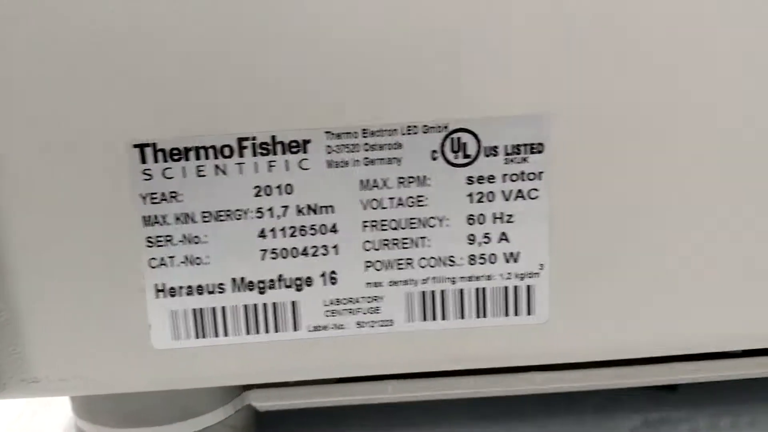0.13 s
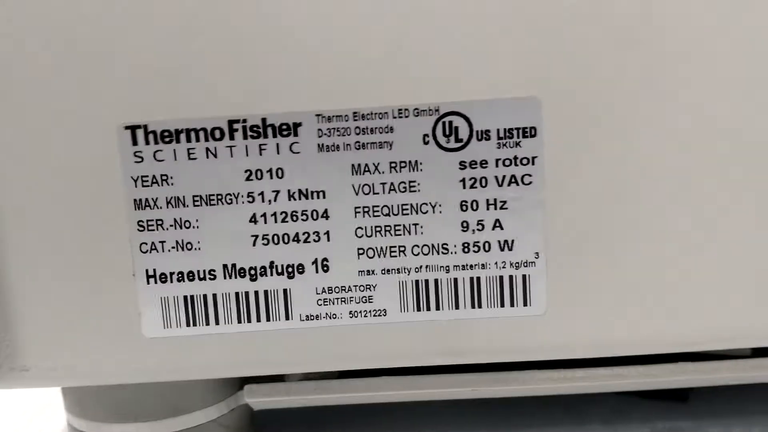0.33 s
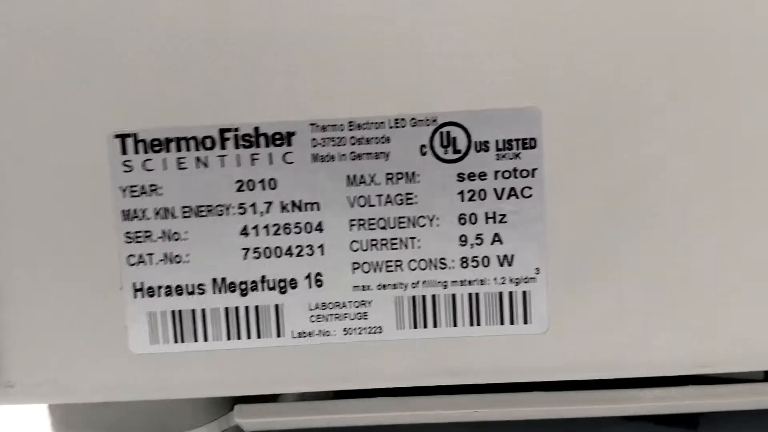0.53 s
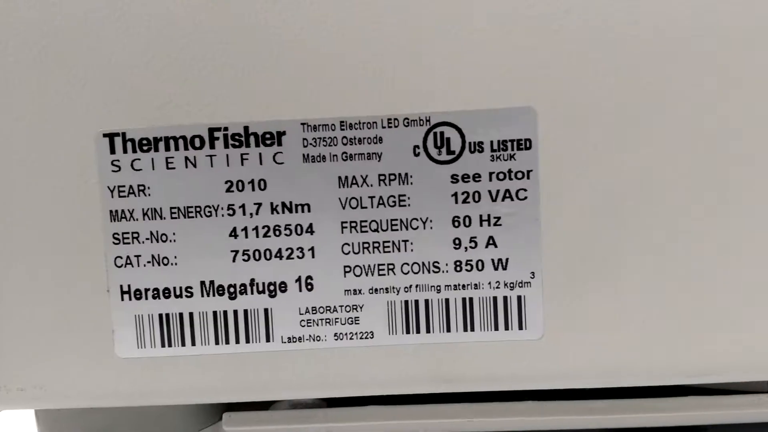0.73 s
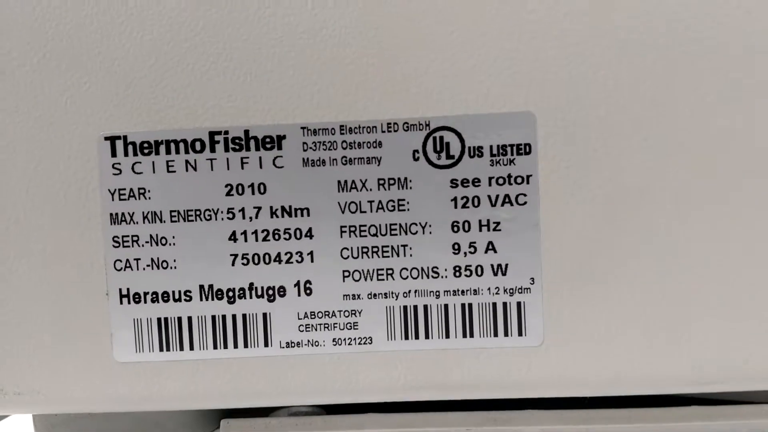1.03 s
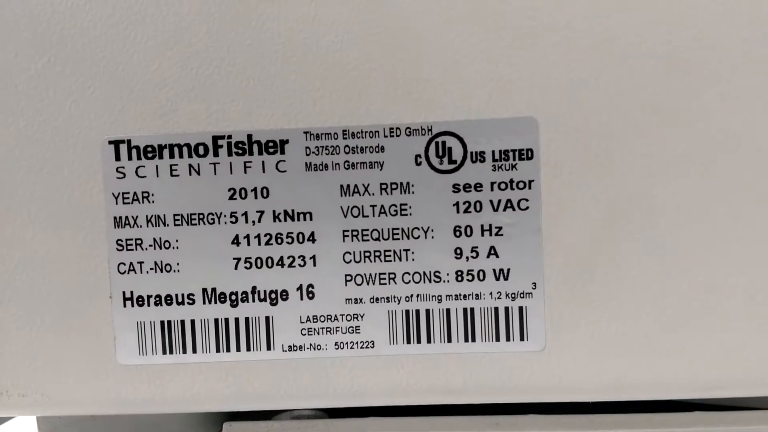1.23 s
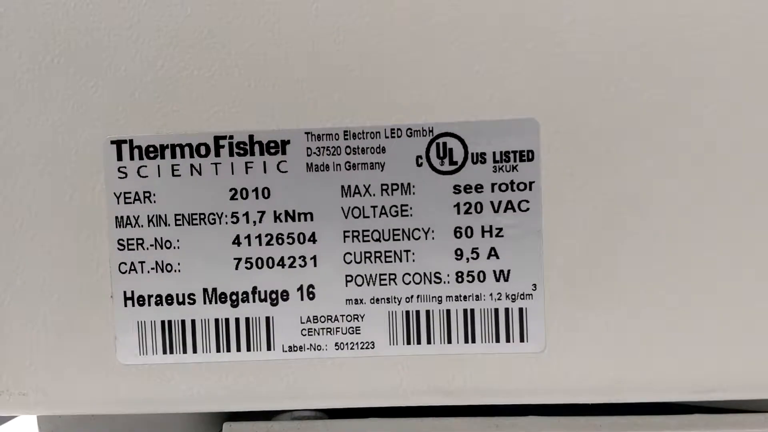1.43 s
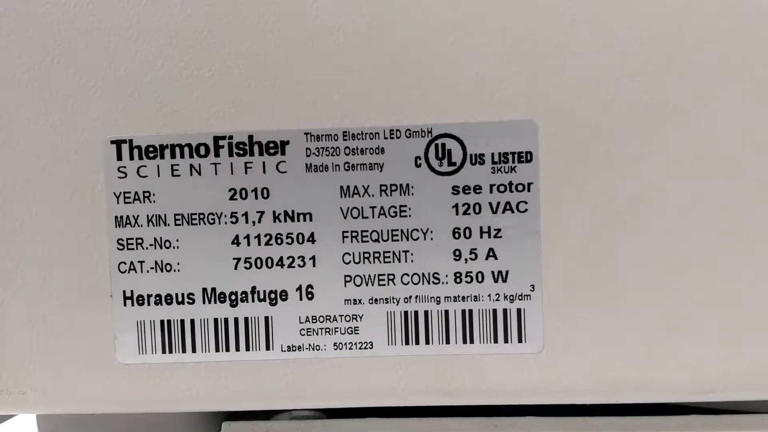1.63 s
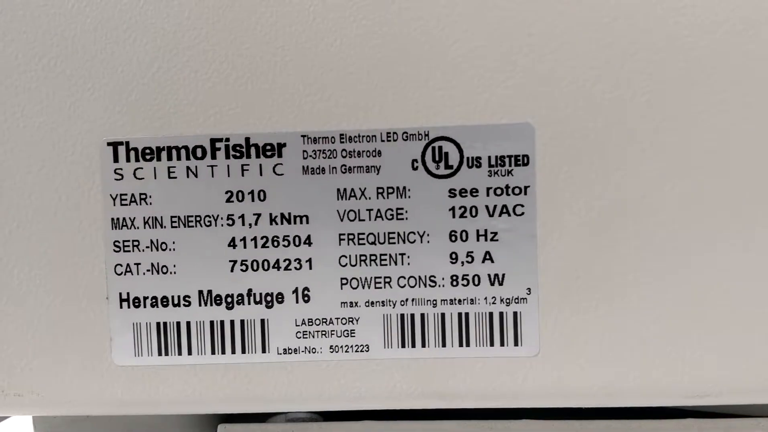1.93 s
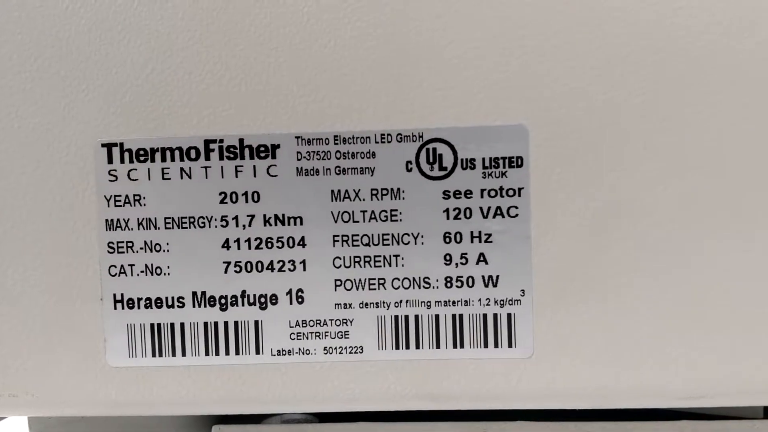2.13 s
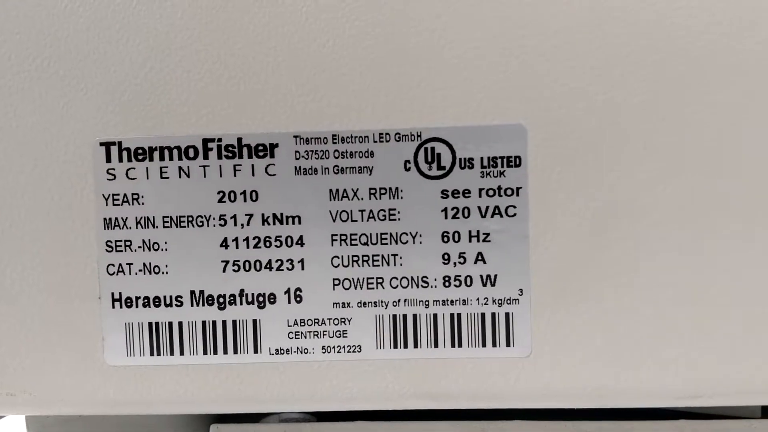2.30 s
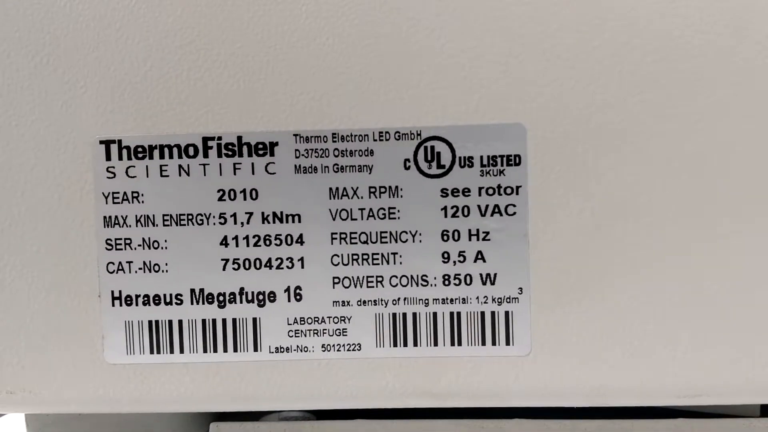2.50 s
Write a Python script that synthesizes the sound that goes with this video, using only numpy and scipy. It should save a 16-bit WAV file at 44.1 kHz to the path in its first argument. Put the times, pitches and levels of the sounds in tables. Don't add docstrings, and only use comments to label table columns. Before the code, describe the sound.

A laboratory centrifuge accelerates throughout, close to a hand-held stereo phone indoors. Its smooth hum, near 205 Hz with an octave above, glides slightly upward over low airy rumble, soft hiss and fan hum, with thin high bearing tones passing. A finger creaks and snaps faintly around 0.4 s, ticking at 0.8 and 1.2-1.3 s. Air dips near 1.4 s; a faint rapid rattle swells until 2.3 s; whirring continues to about 2.6 s.

```python
import sys
import numpy as np
from scipy import signal
from scipy.io import wavfile
from scipy.ndimage import uniform_filter1d

SR = 44100
rng = np.random.default_rng(int(sys.argv[2]) if len(sys.argv) > 2 else 0)


def int16_out(signal):
    q = np.round(np.clip(np.atleast_2d(signal).T, -1, 1) * 32767)
    wavfile.write(sys.argv[1], SR, q.astype(np.int16))


def invert_db(x):
    u = np.asarray(x, float) / 20
    return 10 ** u


N = 117306

# [f/Hz, left level/dB, right level/dB, left lead/rad]
UNBALANCE_PATH = [(51, -58, -62, 0), (55, -50, -48, .3), (59, -49, -43, 1.7), (60.7, -40, -36, 2.2),
                  (62.4, -40, -38, 2.3)]
BUCKET_PATH = [(206.7, -29.5, -27.5, 0.7), (209.8, -32, -20.5, -.5), (217, -23, -40, -3),
               (229.2, -38, -29.5, -1.5), (231, -27.5, -27.5, 0.3), (235, -24, -44, -1),
               (243.2, -15.5, -22.5, -1), (247.7, -17.5, -31, -1)]
BUCKET_OCTAVE_PATH = [(411, -31.5, -19.5, .4), (424, -25, -21.5, .1), (429.5, -21, -19, -.3),
                      (436, -23, -20, -.4), (461, -16.5, -15.5, 0.22), (463, -16, -19.5, 0.35),
                      (499, -19, -27, -0.065), (487, -20.5, -24, -0.39)]
BEARING_ORDERS = [77.33, 78.12, 79.75, 81.46, 82.25, 83.5, 84.42, 85.21, 85.58, 88.54, 89.29, 89.67, 91.79,
                  93.75]
BEARING_LEVELS = [-51, -49, -57, -47, -46, -58, -53, -52, -45.5, -54, -54, -48.5, -60, -56]
# [f/Hz, level/dB, width/Hz]
LOOSE_PART_MODES = [(10350, -1, 700), (11400, -1, 900), (11200, -4, 3500)]
# [t/s, length/s, level/dB, f/Hz, width/Hz]
CREAKS = [
    (.384, .012, -44, 12000, 9000),
    (.3955, .0022, -32, 11000, 9000),
    (.3985, .009, -47, 8000, 9000),
    (.4136, .0028, -41, 9500, 9000),
]
# [t/s, length/s, level/dB, f/Hz, width/Hz]
TICKS = [
    (.4374, .003, -54, 9000, 5000),
    (.7882, .0018, -44, 10500, 2200),
    (1.226, .003, -49, 11500, 6000),
    (1.303, .0025, -52, 11500, 6000),
]
# [f/Hz, width/Hz, level/dB]
SHELL_MODES = [(3300, 500, 12), (6200, 400, 14), (7500, 500, 13)]
# [t/s, level/dB]
AIR_SWELL = [
    (0, -27),
    (.3, -26.5),
    (.5, -27.5),
    (.6, -25),
    (1.2, -23.5),
    (1.29, -23),
    (1.38, -26),
    (2.1, -24.5),
    (2.66, -25.5),
]
# [f/Hz, level/dB per Hz]
RUMBLE_COLOUR = [(40, -6), (70, -11.5), (120, 0), (200, -0.5), (320, -4), (550, -2.5), (980, 0), (1250, -7)]
# [f/Hz, level/dB per Hz]
HISS_COLOUR = [(1000, -3.5), (1500, -0.5), (2100, -5), (2900, -9.5), (4400, -13), (6000, -13),
               (8500, -23.5), (19000, -35.5)]
# [f/Hz, left minus right level/dB]
MIC_TILT = [(60, -5), (350, -4.5), (1090, -.3), (1550, 6), (2050, 0), (8600, 0), (10000, -9.5),
            (15500, -9.5)]

PORT_S = 1 / 2150


def evened(x):
    return x / np.sqrt(np.mean(x ** 2) + 1e-20)


def slow_noise(length):
    noise = uniform_filter1d(rng.standard_normal(N), size=length)
    return evened(uniform_filter1d(noise, size=length))


def read(points, hz):
    f, value = np.transpose(points)
    return np.interp(np.log(hz + 1), np.log(f + 1), value)


def resonate(x, hz, width):
    turn = np.exp(2j * np.pi * hz * np.arange(x.shape[-1]) / SR)
    r = np.exp(-np.pi * abs(width) / SR)
    return 2 * (turn * signal.lfilter([1 - r], [1, -r], x / turn)).real


def ring_twice(x, hz, width):
    return resonate(resonate(x, hz, width), hz, width)


def ports(x, left_db):
    shade_hz, shade_db = 9300, -13
    low = signal.sosfiltfilt(signal.butter(4, shade_hz, fs=SR, output="sos"), x)
    shaded = low + invert_db(shade_db) * (x - low)
    return np.array([-invert_db(left_db) * np.roll(shaded, round(PORT_S * SR)), x])


def shaft():
    start_hz, gain_hz_per_s, slowing = 51.025, 4.634, .1275
    t = np.arange(N) / SR
    hz = start_hz + gain_hz_per_s * t - slowing * t ** 2
    return hz, np.cumsum(hz) / SR


def rotor():
    wobble_db = .7
    hz, turns = shaft()
    out = np.zeros((2, N))
    for order, path in zip((1, 4, 8), (UNBALANCE_PATH, BUCKET_PATH, BUCKET_OCTAVE_PATH)):
        f, *columns = np.transpose(path)
        left_db, right_db, lead = (uniform_filter1d(np.interp(order * hz, f, v), size=4000) for v in columns)
        angle = 2 * np.pi * order * turns
        strength = np.sqrt(2) * invert_db(wobble_db * slow_noise(2500))
        left = invert_db(left_db) * np.cos(angle + lead)
        right = invert_db(right_db) * np.cos(angle)
        out += strength * np.array([left, right])
    return out


def bearing():
    ring_hz, ring_width_hz, noise_db, right_db = 4815, 85, -60, -10.5
    turns = shaft()[1]
    tones = np.zeros(N)
    for order, db in zip(BEARING_ORDERS, BEARING_LEVELS):
        tones += np.sqrt(2) * invert_db(db) * np.cos(2 * np.pi * (order * turns + rng.random()))
    rolling = invert_db(noise_db) * evened(resonate(rng.standard_normal(N), ring_hz, ring_width_hz))
    ring = resonate(resonate(tones, ring_hz, ring_width_hz), ring_hz, 4 * ring_width_hz) + rolling
    return np.array([ring, invert_db(right_db) * np.roll(ring, -7)])


def rattle():
    from_s, to_s, rise_s, level_db, left_db = 1.4, 2.29, .5, -58, 0
    knock_turn, spread_db, chatter, decay_s = .3, 2.5, .25, .0027
    t, turns = np.arange(N) / SR, shaft()[1]
    knock = np.diff(np.floor(turns + knock_turn), prepend=0) > 0
    swell = np.clip((t - from_s) / rise_s, 0, 1) * (t < to_s)
    strength = invert_db(spread_db * rng.standard_normal(200))[turns.astype(int)]
    contact = chatter + np.exp(-t[:720] / decay_s)
    scrape = signal.oaconvolve(knock * swell * strength, contact)[:N] * rng.standard_normal(N)
    ring = sum(invert_db(db) * ring_twice(scrape, hz, width) for hz, db, width in LOOSE_PART_MODES)
    return ports(invert_db(level_db) * evened(ring), left_db)


def finger():
    t, grit, out = np.arange(N) / SR, rng.standard_normal(N), np.zeros(N)
    for s, length, db, hz, width in CREAKS + TICKS:
        u = np.clip((t - s) / length, 0, 30)
        shape = np.minimum(u / 0.11, 1) * np.exp(-u ** 2 * 0.95)
        energy = np.linalg.norm(shape)
        slip = grit * shape * energy / np.linalg.norm(grit * shape)
        band = ring_twice(slip, hz, width)
        sound = band * energy / np.linalg.norm(band)
        if width > 3000:
            sound = sound + sum(invert_db(d) * resonate(slip, f, w) for f, w, d in SHELL_MODES)
        out += invert_db(db) * sound
    out = signal.sosfilt(signal.butter(2, 2200, "high", fs=SR, output="sos"), out)
    return ports(out, left_db=4)


def likeness(hz, near):
    diffuse_to_hz, direct_share = 8800, .3
    near_from_hz, near_to_hz = 150, 1150
    field, comb = np.sinc(2 * hz * PORT_S), np.cos(2 * np.pi * hz * PORT_S)
    far = 1 / (1 + (hz / diffuse_to_hz) ** 5.5)
    direct = (1 - far) * direct_share * np.exp(2j * np.pi * hz * PORT_S)
    same = far * (field - comb) / (1 - field * comb + 1e-9) - direct
    near = near / (1 + (near_from_hz / (hz + 1)) ** 4) / (1 + (hz / near_to_hz) ** 12)
    return near + (1 - near) * same


def air(colour, level_db, follows, near, patchy_db, flicker_db):
    unlike_at_1khz, unlike_top, unlike_wander_db, mean_db = .003, .03, 6, -25.5
    frames, hz = N // 512 + 5, np.fft.rfftfreq(2048, 1 / SR)
    a, b, c, d, patches = rng.standard_normal((frames, 1025, 5)).T
    patches = evened(uniform_filter1d(uniform_filter1d(patches, size=16, axis=0), size=6, axis=1))
    unlike = np.minimum(unlike_at_1khz * (hz[:, None] / 1000) ** 2, unlike_top)
    unlike = np.clip(unlike * invert_db(unlike_wander_db * patches[::-1]), 0, 1)
    same = likeness(hz, near)[:, None] * (1 - unlike)
    left = a + 1j * b
    right = same * left + np.sqrt(abs(1 - abs(same) ** 2)) * (c + 1j * d)
    tilt = invert_db(read(MIC_TILT, hz)[:, None] / 2)
    z = np.array([left * tilt, right / tilt])
    edge = np.clip(hz / colour[0][0], 0, 1) ** 8 / (1 + (hz / colour[-1][0]) ** 8) ** .5
    z *= invert_db(read(colour, hz)[:, None] + patchy_db * patches) * edge[:, None]
    noise = evened(signal.istft(z, nperseg=2048, noverlap=1536)[1][:, :N])
    swell_db = np.interp(np.arange(N) / SR, *np.transpose(AIR_SWELL)) - mean_db
    return invert_db(level_db + follows * swell_db + flicker_db * slow_noise(900)) * noise


def fan():
    hum_hz, width_hz, level_db, left_db = 336, 3, -43, -8
    hum = invert_db(level_db) * evened(ring_twice(rng.standard_normal(N), hum_hz, width_hz))
    return np.array([-invert_db(left_db) * hum, hum])


def scene():
    rumble = air(RUMBLE_COLOUR, -23, follows=1, near=0.73, patchy_db=0.0, flicker_db=0.87)
    hiss = air(HISS_COLOUR, -36.5, follows=0.92, near=0, patchy_db=0.74, flicker_db=0.69)
    return rotor() + bearing() + rattle() + finger() + rumble + hiss + fan()


def low_pass(x):
    return signal.sosfilt(signal.butter(12, 16170, fs=SR, output="sos"), x)


def record(dry):
    low_cut_hz, edge_hz = 59, 15810
    cut = signal.sosfilt(signal.butter(7, low_cut_hz, "high", fs=SR, output="sos"), dry)
    band_limit = signal.firwin(1201, edge_hz, window=("kaiser", 8), fs=SR)
    mix = signal.oaconvolve(cut, band_limit[None], "same")
    return low_pass(mix)


dry = scene()
out = record(dry)
int16_out(out)
```